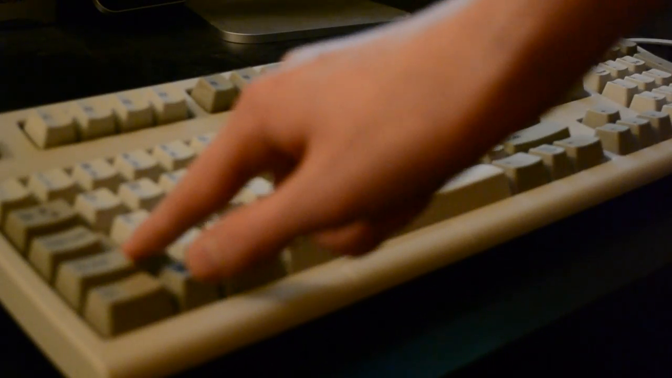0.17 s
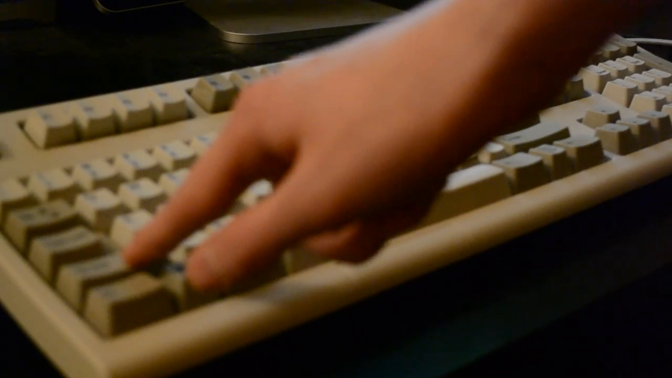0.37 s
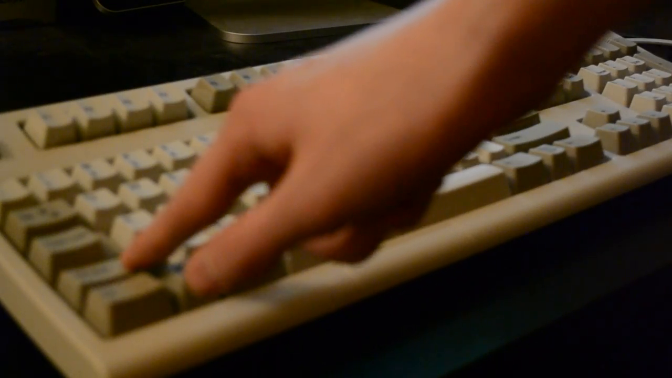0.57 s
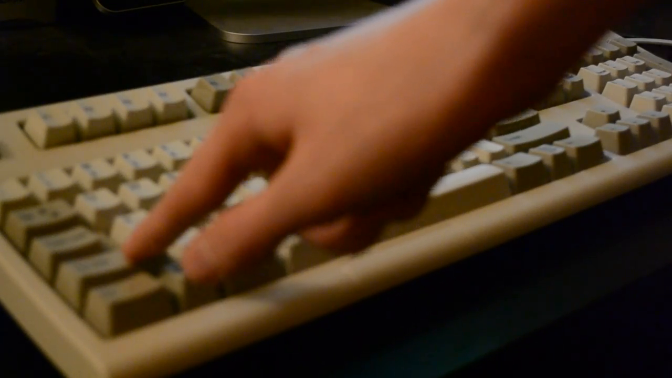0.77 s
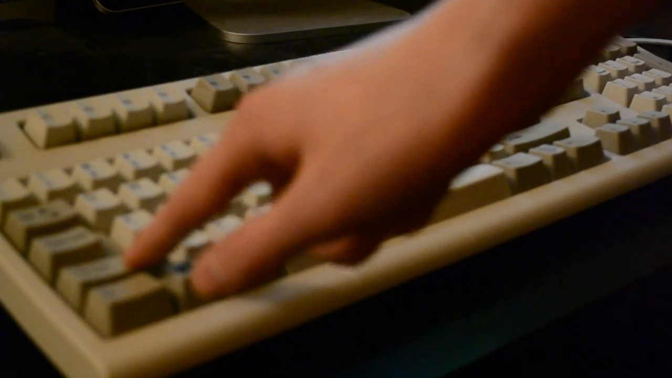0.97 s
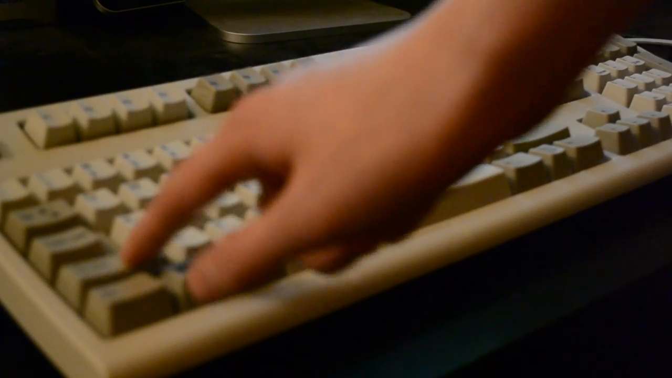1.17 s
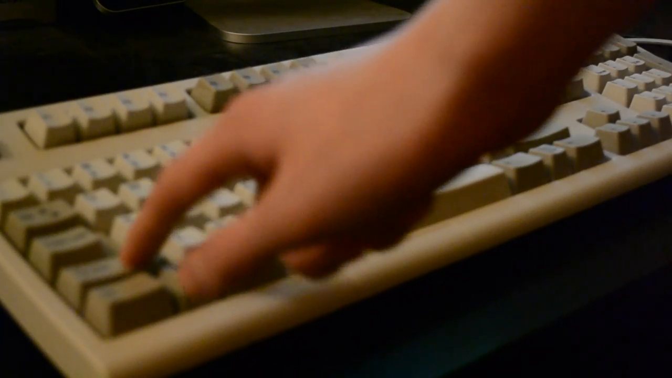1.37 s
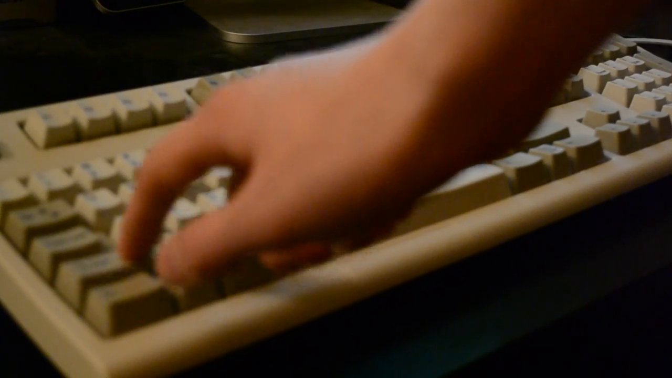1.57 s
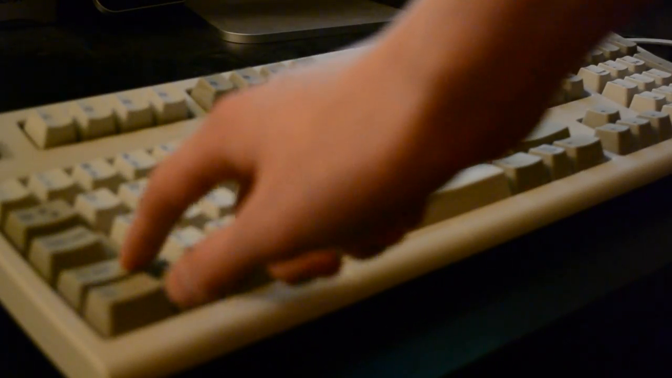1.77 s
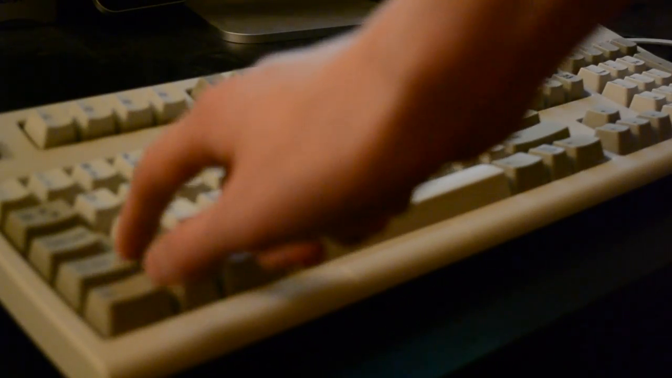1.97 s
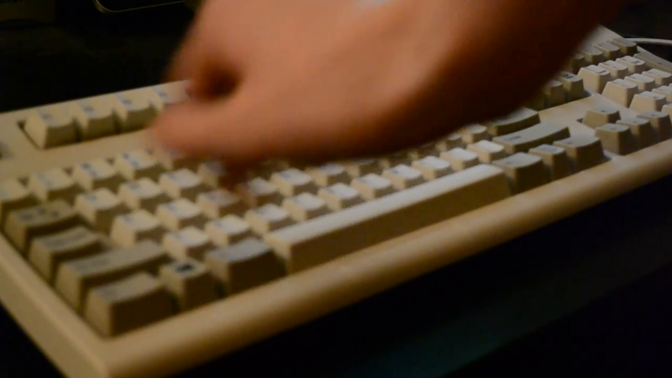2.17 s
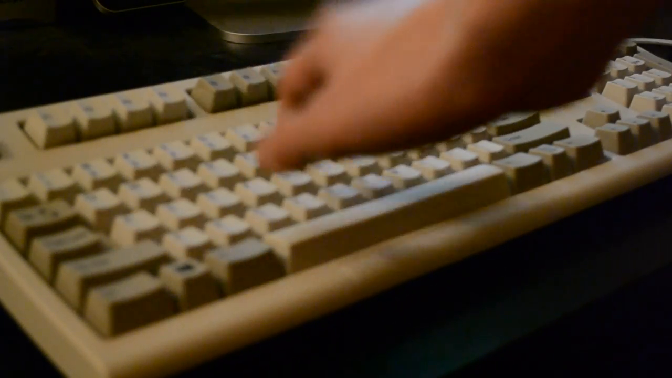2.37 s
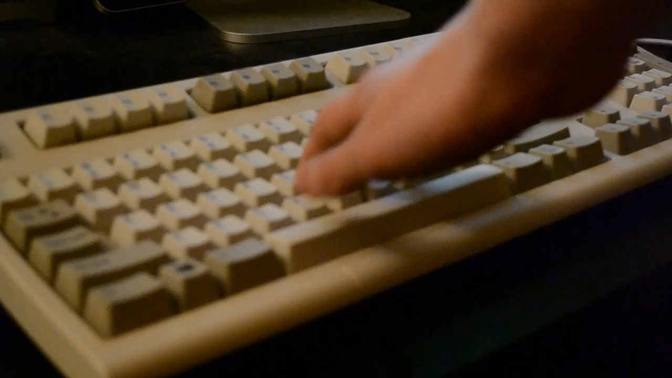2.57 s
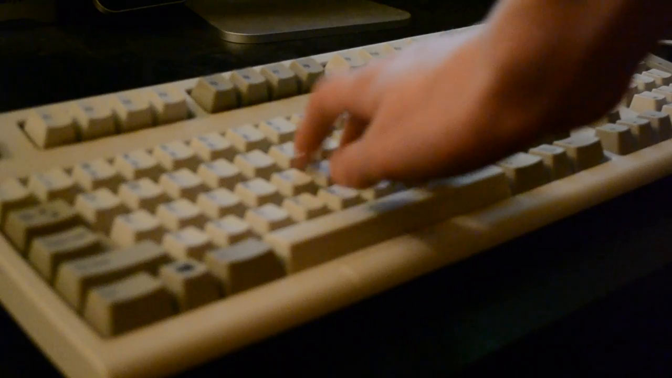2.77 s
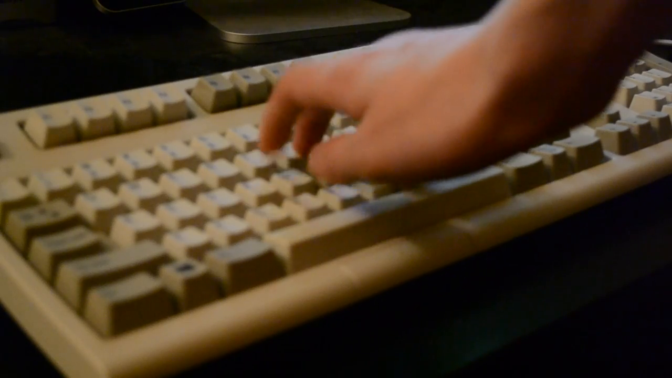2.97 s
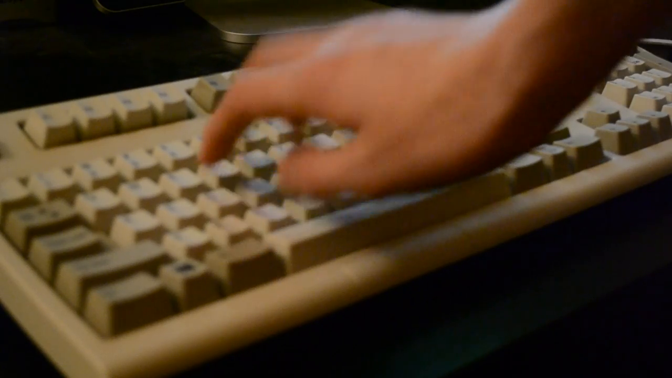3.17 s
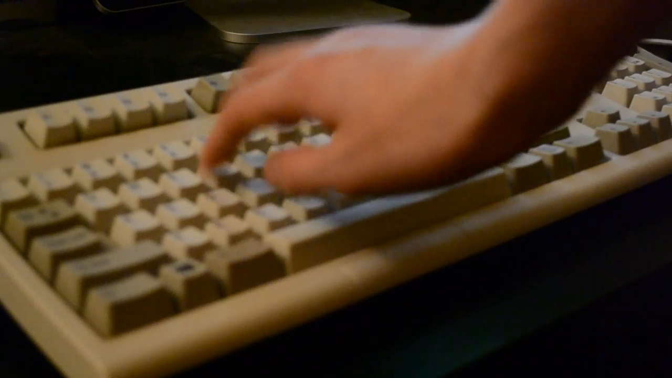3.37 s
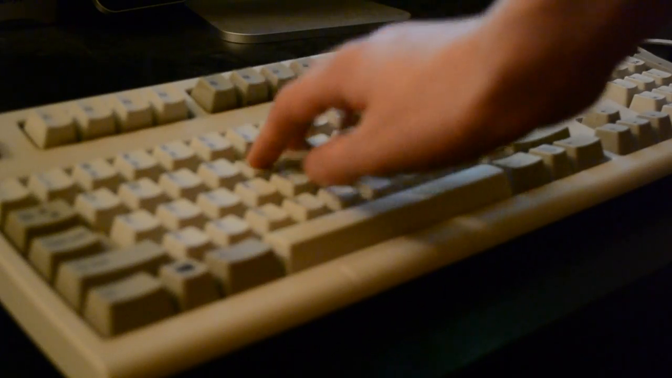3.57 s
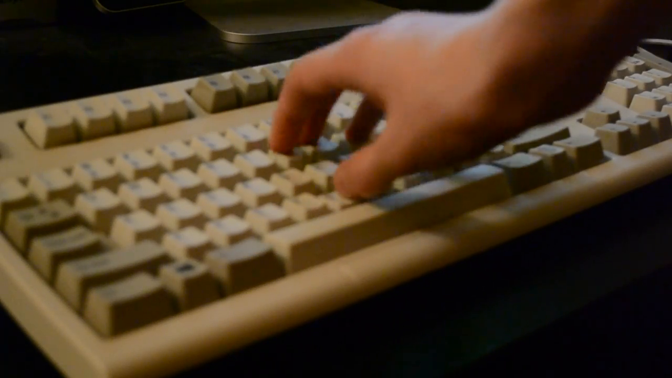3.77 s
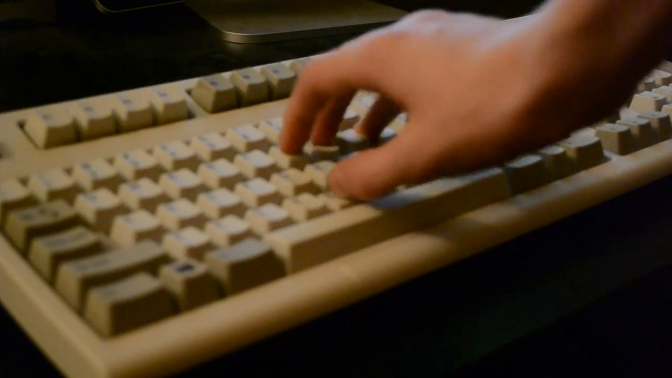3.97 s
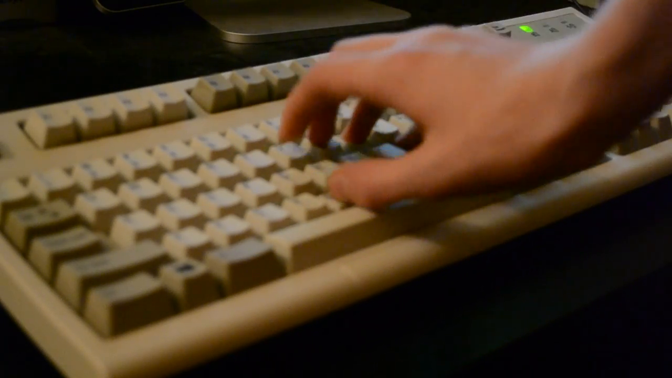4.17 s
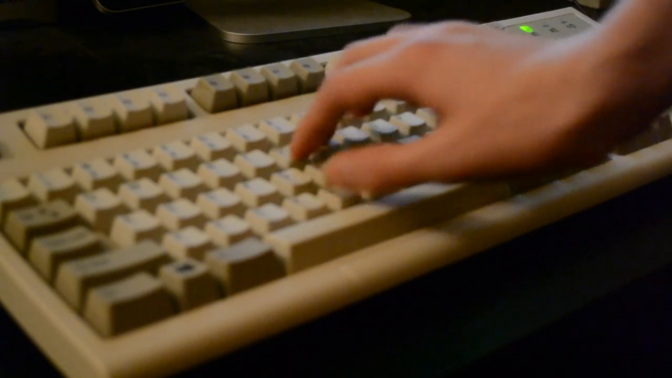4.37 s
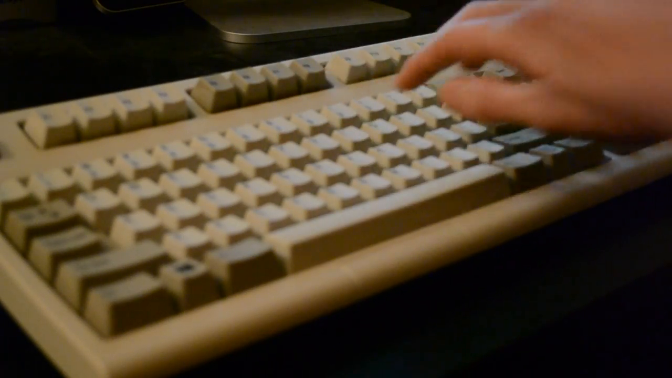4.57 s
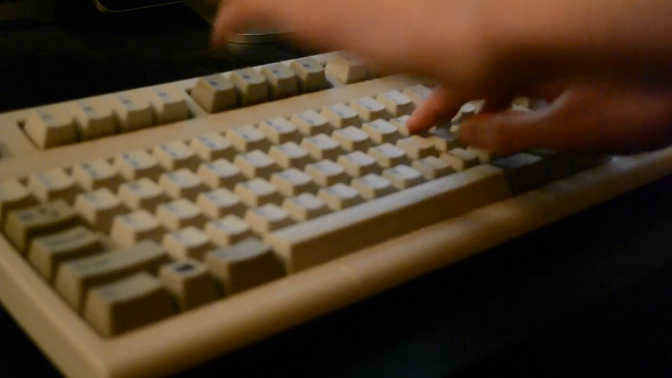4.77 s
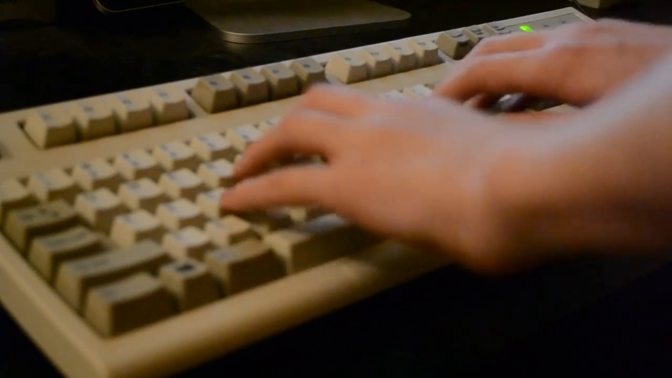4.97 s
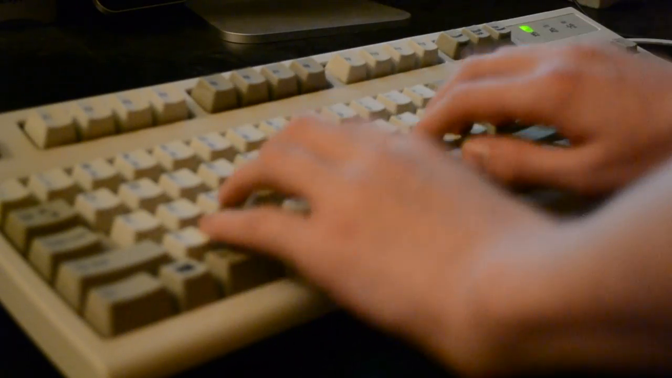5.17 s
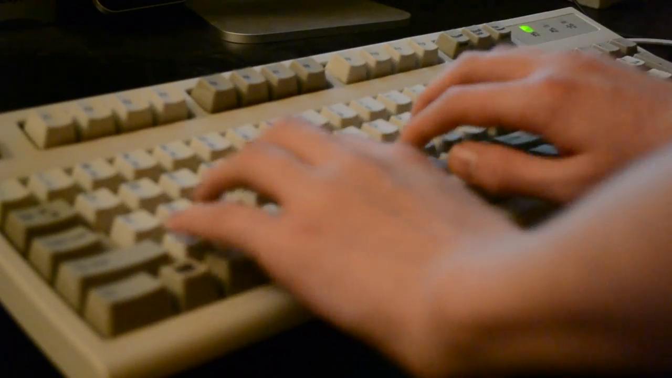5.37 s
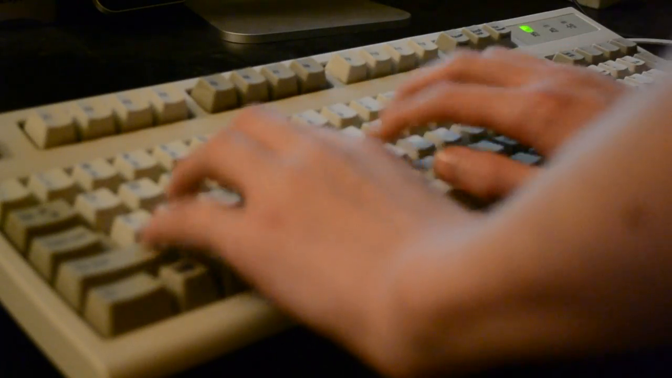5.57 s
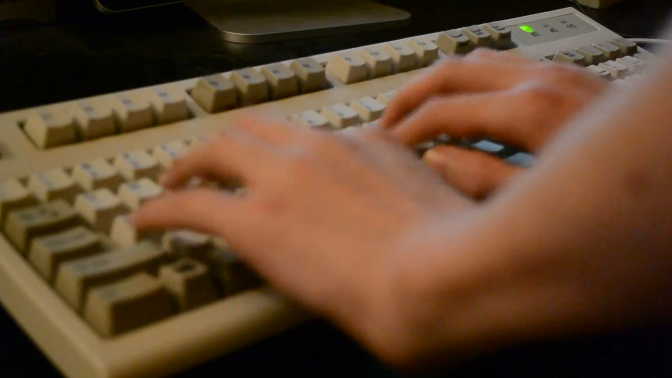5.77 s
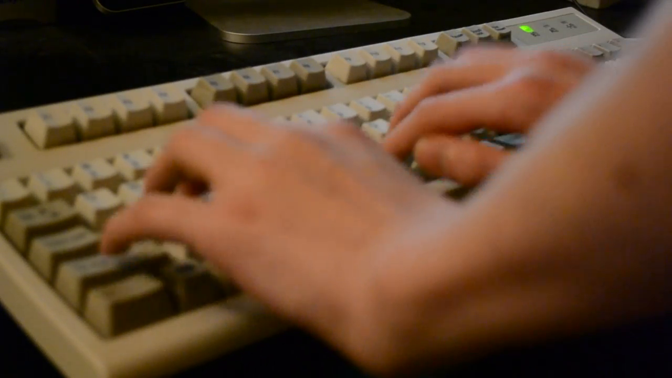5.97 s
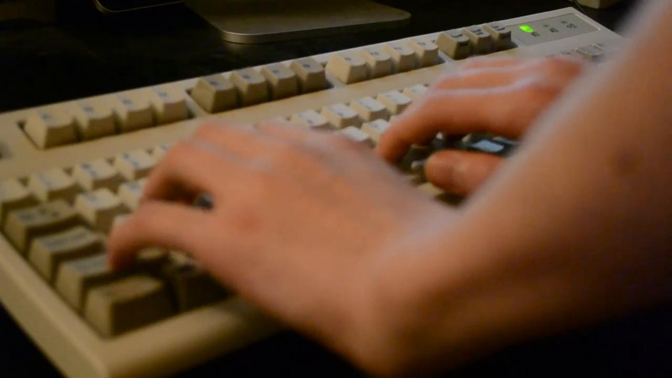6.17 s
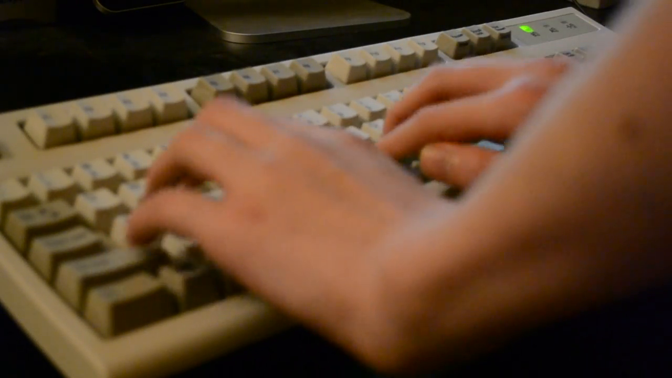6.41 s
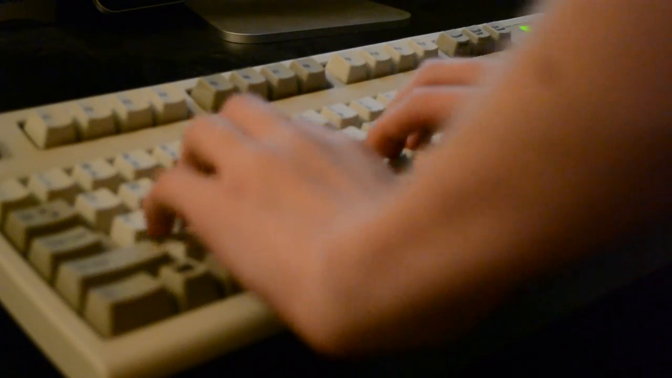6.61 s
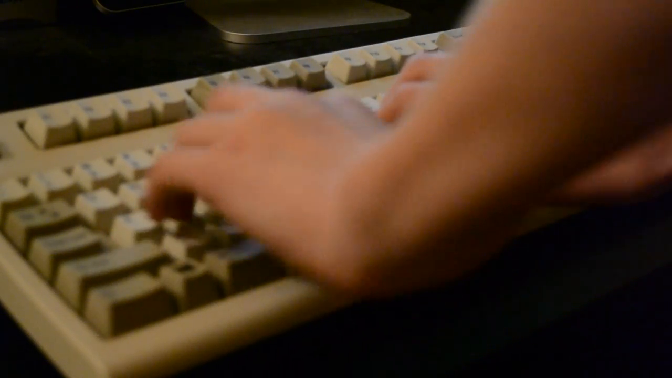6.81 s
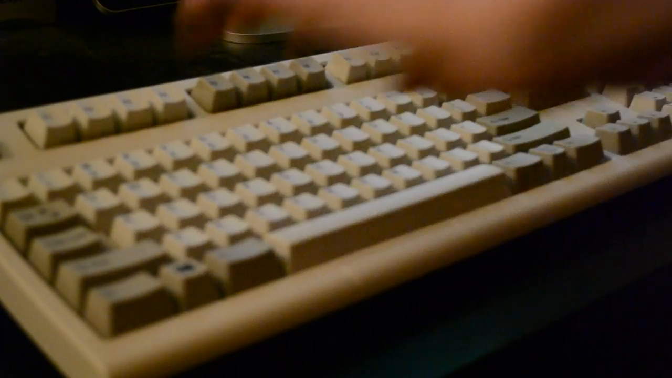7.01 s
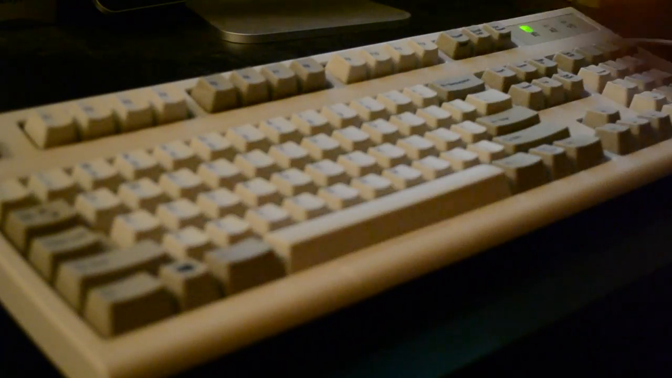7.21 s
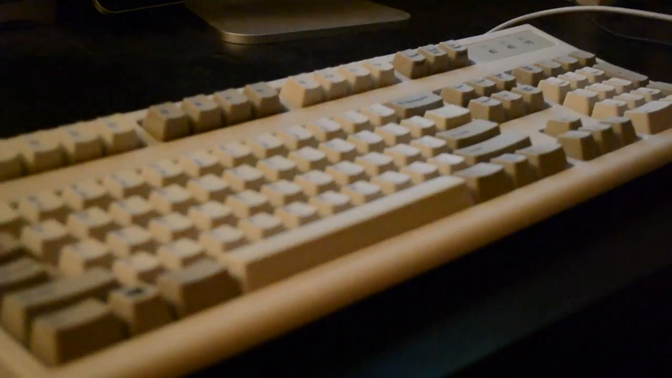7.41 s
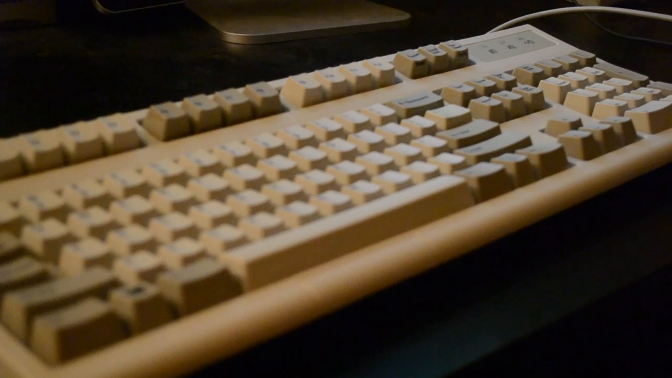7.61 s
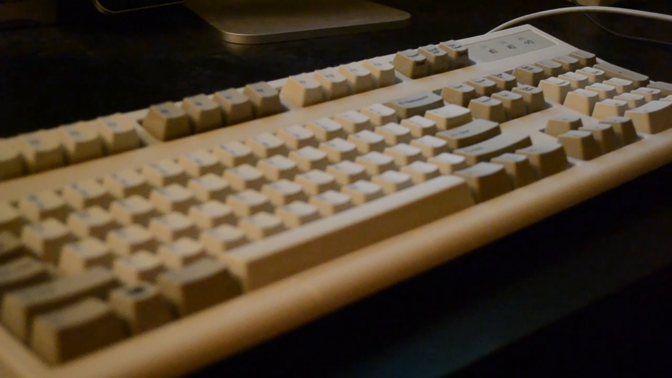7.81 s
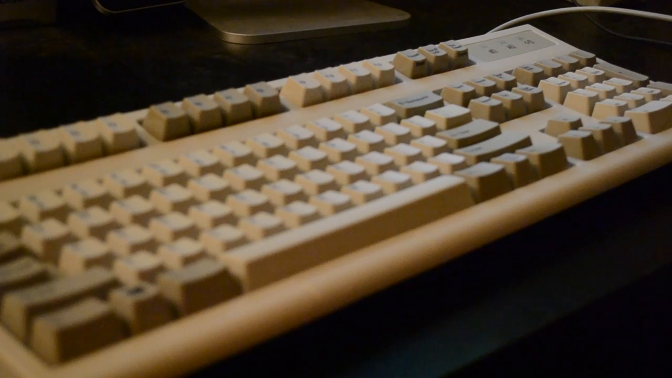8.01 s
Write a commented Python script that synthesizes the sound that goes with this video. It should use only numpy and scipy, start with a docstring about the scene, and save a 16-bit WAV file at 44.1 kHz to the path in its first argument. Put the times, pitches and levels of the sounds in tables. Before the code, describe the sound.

One key on a clicky spring keyboard is tapped faster and faster, then rapid clattering typing bursts follow in a small quiet room.

```python
"""A soft clack opens the scene over faint hum and air: a key at the left edge rises in a small quiet room.
One finger taps that key faster and faster, a faint low tone slips in, then fast typing follows.
Every buckling-spring contact layers a sharp snap, a short rattle of cap and spring, ringing and room answer.
The left key rings its own cap and spring, the other keys ring the steel plate; heavy strokes thump the desk.
Hands brush the caps between two runs, and one small dry click close to the microphone ends the scene."""
import sys
import numpy as np
from scipy import signal
from scipy.fft import rfft, irfft, next_fast_len
from scipy.io import wavfile

SR = 44100
rng = np.random.default_rng(int(sys.argv[2]) if len(sys.argv) > 2 else 0)


def unload_audio(sound):
    """Save the sound as a 16-bit wav file, at the path given as the first command line argument."""
    columns = np.transpose(np.atleast_2d(sound))
    # keep every value between -1 and 1, then stretch to whole-number steps
    steps = np.round(np.clip(columns, -1, 1) * 32767)
    wavfile.write(sys.argv[1], SR, steps.astype(np.int16))


N = 355005  # samples in the scene
TOP_HZ = 11300  # top of the band
LENGTH = 16384  # samples in each short sound
T = np.arange(LENGTH) / SR  # time axis of a short sound, s
HZ = np.fft.rfftfreq(LENGTH, 1 / SR)

# Levels in the tables are relative; each source sets its own overall level.
# still air of the room: [f/Hz, level/dB]
AIR_COLOUR = [(15, -30), (35, -31), (60, -31), (100, -23), (250, -17), (500, -16.5), (800, -17.5),
              (1080, -16), (1600, -21.5), (2400, -24), (2800, -21.5), (3400, -27.5), (4600, -31),
              (7000, -38), (11000, -45.5)]
# steady hum: [f/Hz, level/dB]
HUM_TONES = [(358, -77), (38.5, -99.5)]
# the room's decay: [f/Hz, t60/s]
ROOM_DECAY = [(200, 0.6), (550, 0.34), (1400, 0.24), (3700, 0.33), (9700, 0.19)]
# the microphone's port, a notch and a small rise above it: [f/Hz, level/dB]
MIC_PORT = [(7000, 1), (7500, -0.5), (7900, -7.5), (8400, 3), (9400, 4), (10500, -1)]

# heavy strokes that thump the desk: [t/s, level/dB]
DESK_THUMPS = [(1.491, -52), (1.555, -56), (1.913, -55.5), (2.102, -61), (2.745, -59.5), (3.229, -59),
               (6.922, -50)]
# the desk under the keyboard: [f/Hz, level/dB]
DESK_COLOUR = [(40, -32), (80, -22), (150, -5), (300, -5), (600, -0.5), (1500, -62)]

# the two stages of the small close click: [t/s, level/dB]
CLICK_STAGES = [(7.4203, -49.5), (7.4278, -39)]
# colour of its crack: [f/Hz, level/dB]
CRACK_COLOUR = [(50, -42), (200, -23), (1200, -3), (2800, -4), (4400, -8), (6200, -4), (7000, -20),
                (10400, -6)]
# ringing of the small clicking part: [f/Hz, level/dB, t60/s]
CLICK_RINGING = [(1260, -12, 0.036), (1650, -19, .04), (1860, -28, .04), (2310, -4, 0.018),
                 (2560, 0, 0.023), (3170, 1.5, 0.019), (4250, -2, 0.01), (5980, -10, .008),
                 (10400, -19, .006)]

# keys at the left edge going down: [t/s]
LEFT_PRESSES = [0.46, 0.946, 1.137, 1.318, 1.487, 1.652, 1.774, 1.911, 2.035, 2.101]
# the left key rising against its stop: [t/s, level/dB]
LEFT_RETURNS = [(0.104, -36), (0.707, -37.5), (1.034, -32.5), (1.227, -34), (1.412, -32.5), (1.555, -28.5),
                (1.704, -31.5), (1.834, -24), (1.981, -28), (2.098, -22), (2.106, -26)]
# colour of the left key going down: [f/Hz, level/dB]
LEFT_DOWN_COLOUR = [(100, -27), (400, -18.5), (700, -7), (1000, 2.5), (1500, 3), (1950, -4), (2400, 4),
                    (3700, -1.5), (4500, -6.5), (5100, -7), (5800, -7), (6500, -15.5), (8700, -14.5),
                    (10600, -13)]
# colour of the left key rising, shared by the brushing hands: [f/Hz, level/dB]
LEFT_UP_COLOUR = [(40, -45), (120, -24), (380, -23), (550, -7.5), (750, -2.5), (1000, -1), (1600, -1),
                  (2600, -8.5), (4000, -17), (6000, -19), (7500, -22.5), (8800, -21), (10600, -30)]
# ringing of the left key's cap and spring: [f/Hz, level/dB, t60/s]
LEFT_KEY_RINGING = [(994, 10.5, 0.15), (1255, 11.5, 0.1), (1600, 16, 0.072), (2380, -4, 0.13),
                    (3040, 4.5, 0.2), (3400, 2, 0.2), (3740, 3, 0.21), (5870, -2, 0.1), (8680, -19, .12),
                    (10540, -12, 0.2)]
# level of the first press, and its growth as the finger speeds up
PRESS_DB, PRESS_GROWS_DB_PER_S = -28.3, 1.6
# the rising cap comes loose this long before its stop, at one soft level
LOOSEN_S, LOOSEN_DB = 0.017, -40.5

# typed keys whose spring buckles with a bright snap: [t/s, level/dB]
SPRING_BUCKLES = [(2.509, -23.5), (2.709, -19.5), (2.759, -24.5), (2.841, -23), (2.893, -27.5),
                  (2.935, -31), (3.014, -30), (3.045, -18), (3.229, -19.5), (3.495, -13.5), (3.702, -15),
                  (3.708, -15.5), (3.853, -24.5), (3.935, -24.5), (4.03, -19.5), (4.16, -21), (4.289, -20),
                  (4.325, -22.5), (4.855, -34), (4.919, -22.5), (4.937, -25.5), (5.245, -18),
                  (5.308, -29.5), (5.613, -29), (5.662, -20), (5.744, -23), (5.781, -23.5), (5.864, -32.5),
                  (5.889, -20), (5.923, -22), (6.152, -21), (6.359, -22), (6.518, -25.5), (6.533, -20),
                  (6.792, -18.5), (6.851, -23.5), (6.875, -17.5), (6.92, -16.5)]
# typed keys that hit their stop with a hard, duller clack: [t/s, level/dB]
STOP_CLACKS = [(2.661, -28.5), (2.678, -26), (2.688, -20), (2.812, -23), (2.918, -29.5), (2.99, -29),
               (3.061, -22), (3.074, -18), (3.222, -19.5), (3.51, -27), (3.551, -23.5), (3.57, -19.5),
               (3.586, -18), (3.609, -20), (3.844, -28), (4.017, -24), (4.169, -19), (4.358, -24.5),
               (4.9, -30), (5.185, -18.5), (5.321, -28), (5.76, -20.5), (5.795, -27), (6.029, -28.5),
               (6.103, -23), (6.11, -20), (6.198, -30.5), (6.904, -14), (6.932, -19.5)]
# deep strokes that knock the case and set the plate ringing: [t/s, level/dB]
CASE_KNOCKS = [(3.35, -27.5), (4.123, -27), (4.34, -24.5), (4.388, -25.5), (4.755, -33), (5.041, -27),
               (5.053, -28), (5.359, -25.5), (5.393, -34.5), (5.703, -29.5), (5.995, -27), (6.406, -30.5),
               (6.484, -31), (6.677, -20.5)]
# loose caps rattling as a finger pushes or lets go: [t/s, level/dB]
CAP_RATTLES = [(2.491, -25.5), (2.574, -27.5), (2.594, -28), (2.793, -28.5), (2.824, -23), (3.125, -26),
               (3.323, -25), (3.488, -19), (3.803, -23.5), (3.813, -23.5), (3.906, -25.5), (3.922, -23),
               (4.258, -22), (4.663, -49), (4.728, -26.5), (4.801, -43), (4.818, -31.5), (4.891, -29.5),
               (4.983, -32.5), (5.145, -43), (5.295, -26), (5.432, -37), (5.525, -23), (5.573, -32),
               (5.822, -24), (5.842, -24.5), (6.062, -26.5), (6.278, -42.5), (6.325, -28), (6.603, -33.5),
               (6.64, -21), (6.76, -19.5)]
# a fingertip lands on a cap just before driving it down: [t/s]
FINGER_LANDINGS = [3.032, 3.215, 3.479, 3.691, 5.176, 5.517, 5.654, 6.752]
LANDING_DB = -29  # the same for every landing
# the fastest runs, in which neighbouring caps tick faintly at random: [start t/s, end t/s]
FAST_RUNS = [(2.68, 3.17), (3.52, 4.31), (5.2, 5.34), (5.68, 6.2), (6.53, 6.92)]
TICKS_PER_S, TICK_DB, TICK_SCATTER_DB = 18, -36, 3.5
# colour of the typed keys: [f/Hz, level/dB]
TYPED_COLOUR = [(25, -52), (60, -39), (120, -35), (300, -24), (450, -24.5), (670, -11.5), (790, -5),
                (950, 1.5), (1500, -0.5), (2300, -4), (3300, -10.5), (4700, -17), (7000, -20), (8600, -26),
                (10200, -25)]
# ringing of the steel plate and case: [f/Hz, level/dB, t60/s]
PLATE_RINGING = [(509.3, -16.5, 0.32), (724, -6, 0.44), (743, -3.5, 0.23), (913, 8.5, 0.19),
                 (988, -12, 0.099), (1210, 5, 0.21), (1454, -2.5, 0.42), (1800, -6, 0.14), (2020, -8, 0.12),
                 (3640, -16, 0.19), (4260, -4.5, 0.18), (5550, -14, 0.089)]


def amp(db):
    """Decibels to gain."""
    return 10 ** (np.asarray(db) / 20)


def unit(x):
    """Scale to rms 1."""
    return x / np.sqrt(np.mean(x ** 2) + 1e-20)


def burst(x):
    """Scale a short sound to the energy of 10 ms at rms 1."""
    return x / np.sqrt(np.sum(x ** 2) * 100 / SR + 1e-20)


def along(points, hz):
    """Read (Hz, value) points on a log frequency axis."""
    f, value = np.transpose(points)
    return np.interp(np.log(hz + 1), np.log(f), value)


def fade(t60, t=T):
    """Exponential decay, 60 dB down after t60 seconds."""
    return np.exp(-np.log(1000) * t / t60)


def onset(rise):
    """Gain that swells from silence with time constant rise in seconds."""
    return 1 - np.exp(-T / rise)


def swell(start, end, attack, release):
    """Gain that rises from start, holds until end and then falls away; all in seconds."""
    t = np.arange(N) / SR
    return np.clip((t - start) / attack, 0, 1) * np.clip(1 - (t - end) / release, 0, 1)


def causal(db):
    """Minimum-phase response for a dB curve, so that nothing sounds before the blow."""
    cepstrum = irfft(np.log(amp(db)))
    # fold the second half of the cepstrum onto the first
    cepstrum[1:LENGTH // 2] *= 2
    cepstrum[LENGTH // 2 + 1:] = 0
    return np.exp(rfft(cepstrum))


def through(x, response):
    """Filter a short sound."""
    return irfft(rfft(x) * response)


def add(track, s, sound):
    """Mix a sound into the track at time s in seconds."""
    part = track[max(round(s * SR), 0):][:len(sound)]
    part += sound[:len(part)]


def noise(colour, spiky=0):
    """Long noise of rms 1 in a given colour; spiky makes it grainy."""
    size = next_fast_len(N)
    grains = rng.standard_normal(size) * np.exp(spiky * rng.standard_normal(size))
    gain = amp(along(colour, np.fft.rfftfreq(size, 1 / SR)))
    return unit(irfft(rfft(grains) * gain, size)[:N])


def room_tone(air_db=-68):
    """Soft air noise with a steady hum of pure tones."""
    t = np.arange(N) / SR
    air = amp(air_db) * noise(AIR_COLOUR)
    hum = sum(amp(db) * unit(np.sin(2 * np.pi * hz * t)) for hz, db in HUM_TONES)
    return air + hum


def room_tail():
    """A diffuse answer of energy 1 that builds within milliseconds; each frequency dies at its own speed."""
    hz, t, bands = signal.stft(rng.standard_normal(LENGTH), SR, nperseg=256)
    decaying = bands * fade(along(ROOM_DECAY, hz)[:, None], t)
    tail = signal.istft(decaying, SR, nperseg=256)[1][:LENGTH]
    tail = tail * onset(0.008)
    return tail / np.linalg.norm(tail)


def low_tone(start=2.33, end=2.49, pitch_hz=243, waver_hz=12, waver_per_s=3.5, level_db=-73):
    """A faint low tone before the first run; its pitch dips and then rises a little."""
    t = np.arange(N) / SR
    hz = pitch_hz - waver_hz * np.sin(2 * np.pi * waver_per_s * (t - start))
    tone = unit(np.sin(2 * np.pi * np.cumsum(hz) / SR))
    return amp(level_db) * swell(start, end, attack=0.024, release=0.04) * tone


def hands(start=4.35, end=4.72, level_db=-65):
    """Fingertips brush the loose caps without pressing them while the hands shift between two runs."""
    brush = noise(LEFT_UP_COLOUR, spiky=0.37)
    return amp(level_db) * swell(start, end, attack=0.12, release=0.08) * brush


def snap(t60, scrape, rise=0.00044):
    """One hard impact with a short scraping contact around it; scrape is the scraping's gain."""
    scraping = burst(rng.standard_normal(LENGTH) * fade(t60) * onset(rise))
    impact = burst(signal.unit_impulse(LENGTH, round(0.0005 * SR)))
    return scrape * scraping + impact


def rattle(t60, rise, spiky):
    """Loose parts chatter: dense micro-impacts of uneven size that die away."""
    impacts = rng.standard_normal(LENGTH) * np.exp(spiky * rng.standard_normal(LENGTH))
    return impacts * fade(t60) * onset(rise)


def ring(modes, scatter_db, rise, count):
    """Ringing for count blows: each strikes the modes at new strengths, since it lands on another spot."""
    hz, db, t60 = np.transpose(modes)
    chance = rng.standard_normal((count, 3, len(hz)))
    size = amp(db + scatter_db * chance[:, 0])
    phase = np.arctan2(chance[:, 1], chance[:, 2])
    swing = fade(t60[:, None]) * np.exp(2j * np.pi * hz[:, None] * T) * onset(rise)
    ringing = ((size * np.exp(1j * phase)) @ swing).imag
    return [burst(x) for x in ringing]


def desk():
    """Keys that bottom out hard push the desk top into a soft, low thump."""
    track = np.zeros(N)
    wood = causal(along(DESK_COLOUR, HZ))
    for s, db in DESK_THUMPS:
        thump = rattle(t60=0.24, rise=0.0074, spiky=0.16)
        add(track, s, amp(db) * burst(through(thump, wood)))
    return track


def close_click(room_db=-17, crack_db=-6):
    """A light tick, then a snap, so near that the room hardly answers."""
    track = np.zeros(N)
    body = causal(along(CRACK_COLOUR, HZ))
    for s, db in CLICK_STAGES:
        crack = burst(through(snap(t60=0.023, scrape=1.0), body))
        echo = amp(room_db) * signal.fftconvolve(crack, room_tail())[:LENGTH]
        ringing = ring(CLICK_RINGING, scatter_db=0.5, rise=0.0002, count=1)[0]
        add(track, s, amp(db) * (ringing + amp(crack_db) * crack + echo))
    return track


def keystrokes(rows, colour, modes, level_db, snap_db, knock_db, treble_db, snap_t60, scrape,
               rattle_t60, spiky, ring_db, room_db, vary_db, same_spot):
    """Snap (snap_db over the rattle), rattle and room answer share the key's colour; the blow rings its modes."""
    track = np.zeros(N)
    # a deep stroke knocks the case, a crisp one brightens the spring
    knock_share = np.interp(HZ, [300, 600, 1050, 1350], [0, 1, 1, 0])
    treble_share = 1 - 1 / (1 + (HZ / 3500) ** 8)
    touch_db = knock_db * knock_share + treble_db * treble_share
    touch = causal(touch_db)
    knots = np.geomspace(600, TOP_HZ, 56)  # Hz, where caps differ in colour
    # strokes on the same spot share part of their resonances, rattle and paths through the room
    share = np.clip(same_spot, 0, 1)

    def blend(usual, new):
        """Mix the shared and the new part at constant power."""
        return np.sqrt(share) * usual + np.sqrt(1 - share) * new

    def new_cap():
        """Random resonances of one cap."""
        return rng.standard_normal(len(knots))

    def new_rattle():
        """Fresh chatter of one cap and spring."""
        return burst(rattle(rattle_t60, 0.00036, spiky))

    usual_cap, usual_rattle, usual_tail = new_cap(), new_rattle(), room_tail()
    rings = ring(modes, scatter_db=3.5, rise=0.011, count=len(rows))
    for (s, db), rung in zip(rows, rings):
        cap_db = vary_db * np.interp(HZ, knots, blend(usual_cap, new_cap()), left=0)
        body = causal(along(colour, HZ) + touch_db + cap_db)
        impact = amp(snap_db) * burst(through(snap(snap_t60, scrape), body))
        chatter = burst(through(blend(usual_rattle, new_rattle()), body))
        ringing = amp(ring_db) * burst(through(rung, touch))
        echo = amp(room_db) * burst(through(blend(usual_tail, room_tail()), body))
        add(track, s, amp(level_db + db) * (burst(impact + chatter) + ringing + echo))
    return track


def left_key():
    """The repeated key: a bright buckle going down; rising, the cap comes loose, then clacks dully."""
    presses = [(s, PRESS_DB + PRESS_GROWS_DB_PER_S * (s - LEFT_PRESSES[0])) for s in LEFT_PRESSES]
    down = keystrokes(
        presses, LEFT_DOWN_COLOUR, LEFT_KEY_RINGING,
        level_db=-12.0, snap_db=-11, knock_db=-0.5, treble_db=1.1,
        snap_t60=0.035, scrape=3.4, rattle_t60=0.052, spiky=0.63,
        ring_db=-6, room_db=-2.0, vary_db=2.5, same_spot=0.81)
    loosenings = [(s - LOOSEN_S, LOOSEN_DB) for s, db in LEFT_RETURNS]
    up = keystrokes(
        list(LEFT_RETURNS) + loosenings, LEFT_UP_COLOUR, LEFT_KEY_RINGING,
        level_db=-12.5, snap_db=-15, knock_db=1.6, treble_db=-6.0,
        snap_t60=0.0064, scrape=2.7, rattle_t60=0.071, spiky=0.66,
        ring_db=-9.5, room_db=-0.5, vary_db=3.5, same_spot=0.37)
    return down + up


def ticks():
    """Faint touches scattered around an even grid through each run, as rows of t/s, level/dB."""
    slots = np.concatenate([np.arange(start, end, 1 / TICKS_PER_S) for start, end in FAST_RUNS])
    late, size = rng.standard_normal((len(slots), 2)).T
    times = slots + late / TICKS_PER_S / np.pi
    return np.column_stack([times, TICK_DB + TICK_SCATTER_DB * size])


def typing():
    """Overlapping keystrokes all over the board: each kind of contact has its own hardness and brightness."""
    board = dict(colour=TYPED_COLOUR, modes=PLATE_RINGING, snap_t60=0.012, scrape=2.23,
                 rattle_t60=0.069, spiky=0.98, room_db=-3.0, vary_db=4.0, same_spot=0.094)
    buckles = keystrokes(SPRING_BUCKLES, level_db=-12, snap_db=-1.1,
                         knock_db=-1, treble_db=2, ring_db=-13, **board)
    clacks = keystrokes(STOP_CLACKS, level_db=-13.5, snap_db=2.0,
                        knock_db=-2.2, treble_db=-6.0, ring_db=-9, **board)
    knocks = keystrokes(CASE_KNOCKS, level_db=-10.5, snap_db=-5.5,
                        knock_db=4, treble_db=-4.5, ring_db=-6.5, **board)
    loose = list(CAP_RATTLES) + [(s, LANDING_DB) for s in FINGER_LANDINGS]
    rattles = keystrokes(loose, level_db=-12.0, snap_db=-10.5,
                         knock_db=-0.2, treble_db=-5.9, ring_db=-9.5, **board)
    faint = keystrokes(ticks(), level_db=-14.5, snap_db=-5.5,
                       knock_db=-2.5, treble_db=3, ring_db=-19, **board)
    return buckles + clacks + knocks + rattles + faint


def scene():
    """Room, low tone, hands, desk, click and keyboard at one microphone."""
    background = room_tone() + low_tone() + hands()
    keyboard = desk() + left_key() + typing()
    return (background + close_click() + keyboard)[None]


def record(dry):
    """The microphone port colours the treble; the top of the band rolls off steeply."""
    size = next_fast_len(N + SR // 2)
    hz = np.fft.rfftfreq(size, 1 / SR)
    roll_off = (hz < TOP_HZ + 250) / np.sqrt(1 + (hz / 10500) ** 80)
    return irfft(rfft(dry, size) * amp(along(MIC_PORT, hz)) * roll_off, size)[:, :N]


dry = scene()
out = record(dry)
unload_audio(out)
```